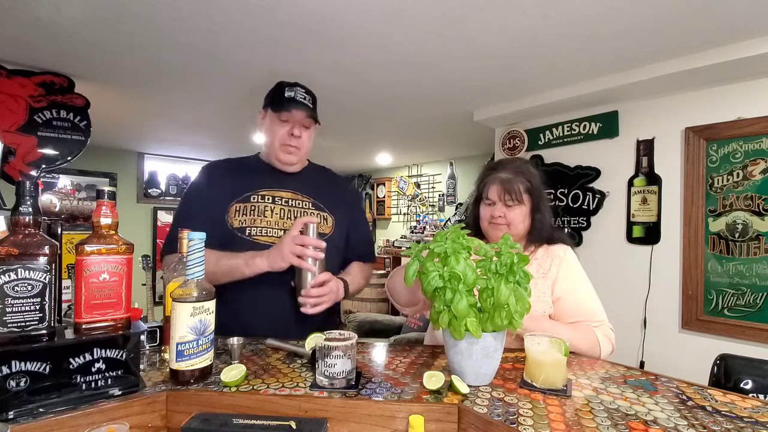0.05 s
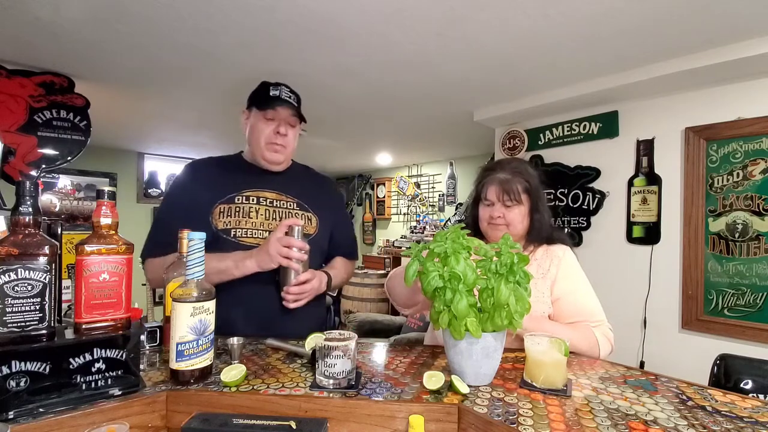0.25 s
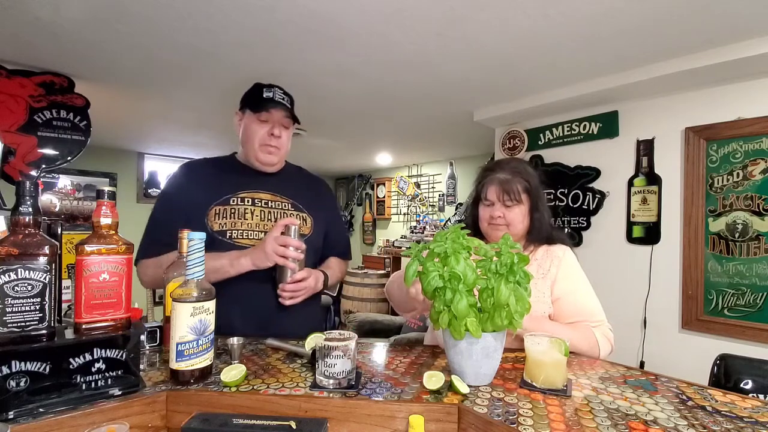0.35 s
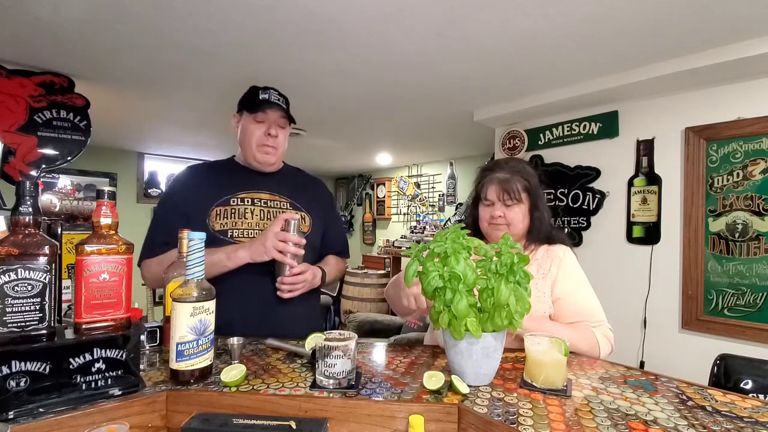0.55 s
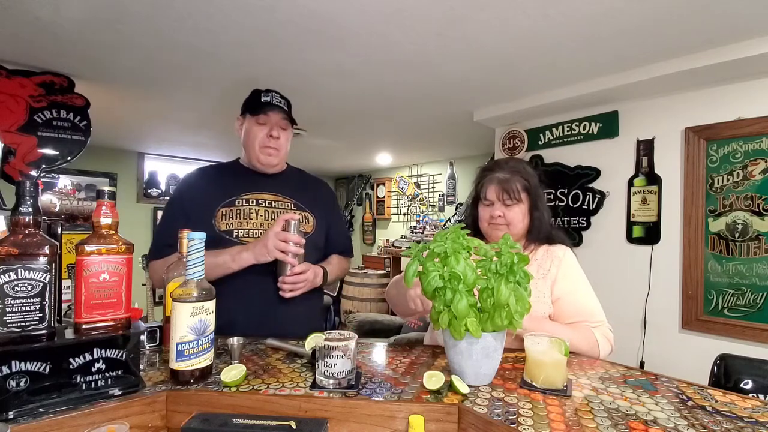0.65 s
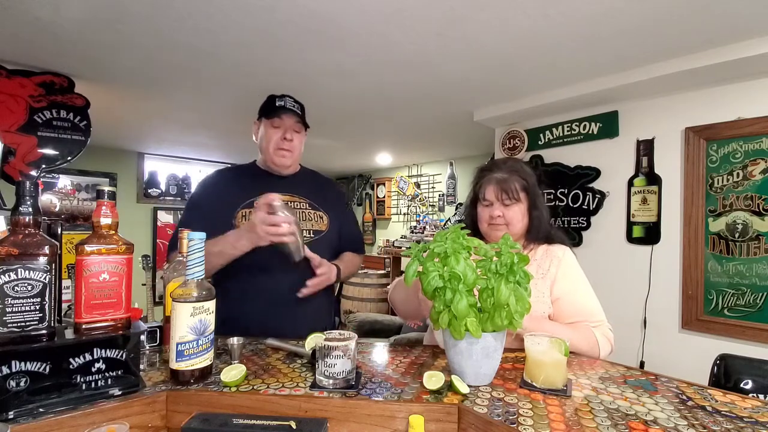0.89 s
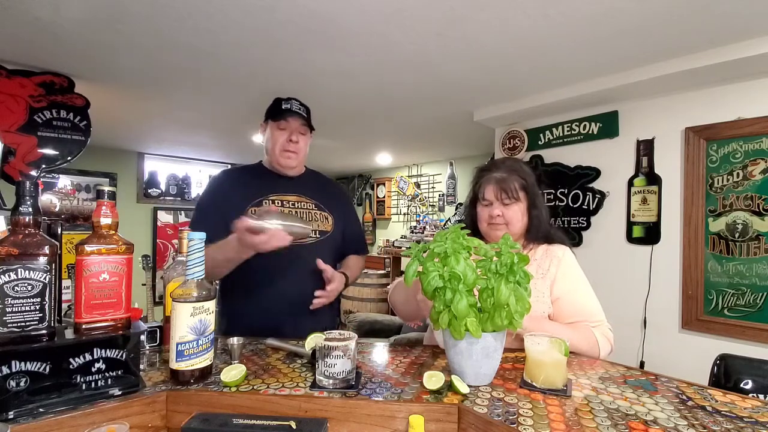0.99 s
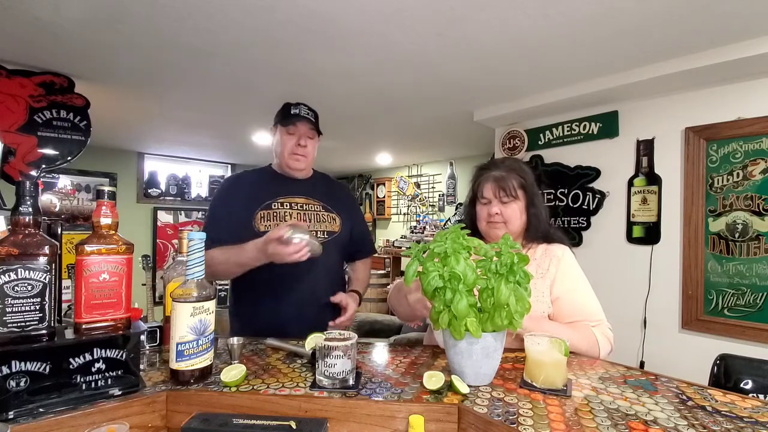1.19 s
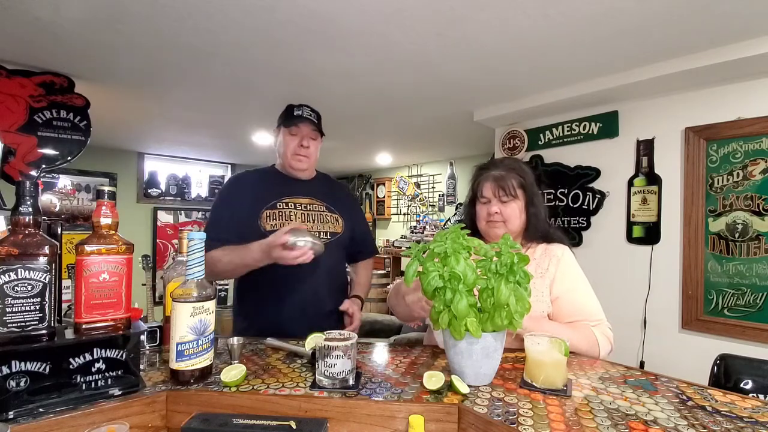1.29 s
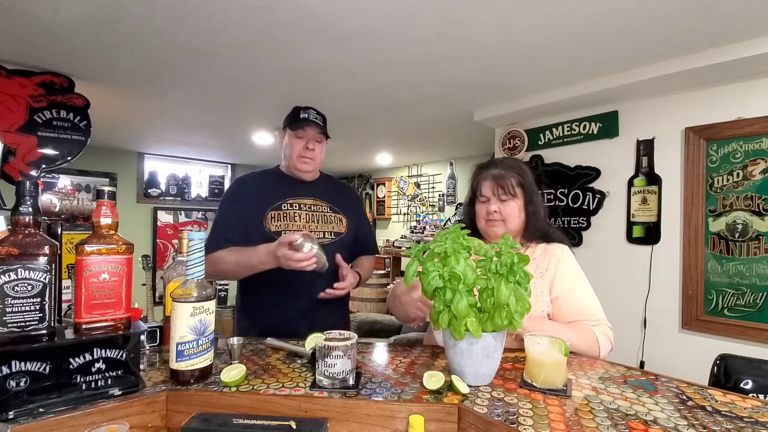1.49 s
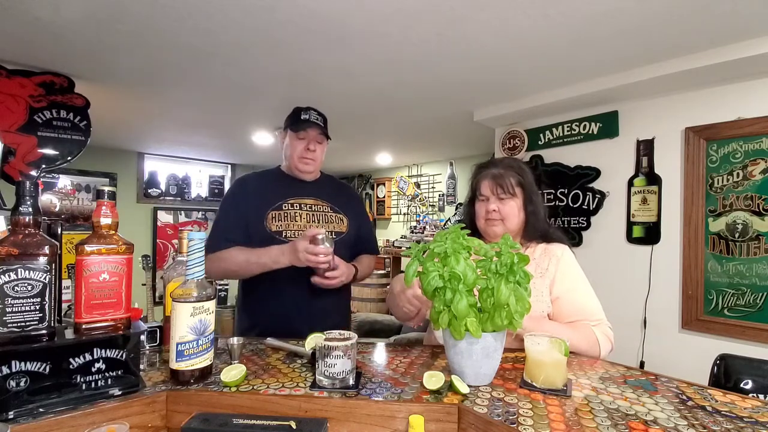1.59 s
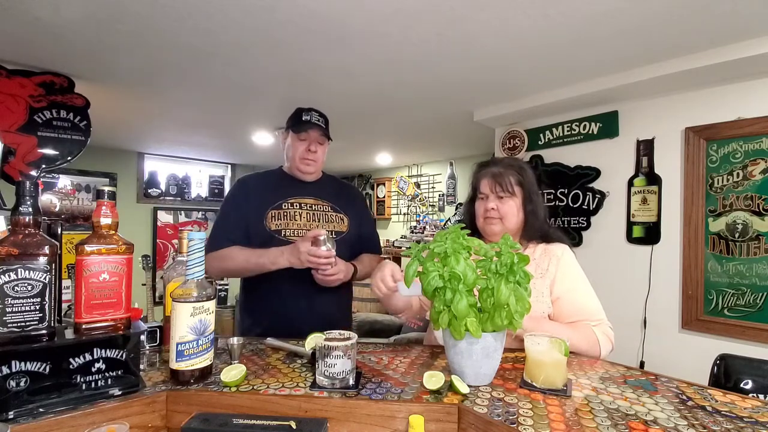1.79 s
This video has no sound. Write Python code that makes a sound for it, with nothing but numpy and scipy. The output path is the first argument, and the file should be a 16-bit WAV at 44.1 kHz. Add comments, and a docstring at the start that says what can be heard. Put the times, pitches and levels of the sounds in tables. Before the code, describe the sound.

Ice cubes knock and ring inside a steel cocktail shaker with sloshing liquid, two quick bouts of shaking, then metal clinks, a palm slap and a last tumble; small reverberant bar room, microphone a few metres away.

```python
"""A faint low room rumble, then ice shaken in a steel cocktail shaker in a small, live bar room, 2-3 m away.
Cubes knock and ring the tin (noise contacts, damped modes) over loose ice and liquid (random grains), in two bouts.
The shaker is then turned and handled: steel clinks (click and ping), a palm slap (short noise), a last tumble.
Soft low thumps (decaying tone and noise) lie beneath; the rumble is steady shaped noise."""
import sys
import numpy as np
from scipy import signal
from scipy.fft import rfft, irfft, next_fast_len
from scipy.io import wavfile
from scipy.ndimage import uniform_filter1d

SR = 44100
rng = np.random.default_rng(int(sys.argv[2]) if len(sys.argv) > 2 else 0)


def transcribe(signal):
    """Save signal, clipped to [-1, 1], as a 16-bit WAV file at the path in sys.argv[1]."""
    frames = np.atleast_2d(signal).T
    limited = np.clip(frames, -1, 1)
    pcm = np.round(limited * 32767).astype(np.int16)
    wavfile.write(sys.argv[1], SR, pcm)


N = 81585
T = np.arange(SR // 2) / SR  # time axis of one event, s
LEVEL_WINDOW_S = 0.005


def amp(db):
    """Decibels to gain."""
    return 10 ** (np.asarray(db) / 20)


def unit(x):
    """Scale to rms 1."""
    return x / np.sqrt(np.mean(x ** 2) + 1e-20)


def norm(x):
    """Scale to energy 1."""
    return x / np.linalg.norm(x)


def fade(t, t60_s):
    """Exponential decay, 60 dB in t60_s."""
    return amp(-60 * t / t60_s)


def swell(rise_s):
    """Exponential approach to 1."""
    return 1 - np.exp(-T / rise_s)


def along(points, hz):
    """Interpolate (f/Hz, value) points on a log frequency axis."""
    f, v = np.transpose(points)
    return np.interp(np.log(hz + 1), np.log(f + 1), v)


def filtered(x, response):
    """x times a response of frequency."""
    m = next_fast_len(N + SR // 2)
    hz = np.fft.rfftfreq(m, 1 / SR)
    return irfft(rfft(x, m) * response(hz), m)[..., :N]


def coloured(x, points, size=4096):
    """x through a causal minimum-phase filter of energy 1 with this spectrum shape."""
    gain = amp(along(points, np.fft.rfftfreq(size, 1 / SR)))
    cepstrum = irfft(np.log(gain))
    cepstrum[1:size // 2] *= 2
    cepstrum[size // 2 + 1:] = 0
    impulse = norm(irfft(np.exp(rfft(cepstrum))))
    return signal.fftconvolve(x, impulse)[:N]


def contact(t60_s, rise_s):
    """A touch and its micro-bounces: noise burst, flattened in spectrum, energy 1."""
    burst = norm(rng.standard_normal(len(T)) * fade(T, t60_s) * swell(rise_s))
    flat = irfft(np.exp(1j * np.angle(rfft(burst))), len(T))
    return norm(flat * fade(T, 10 * t60_s))


def note(hz, t60_s, rise_s):
    """One damped resonance, energy 1."""
    return norm(np.sin(2 * np.pi * hz * T) * fade(T, t60_s) * swell(rise_s))


def blows(rows, sound):
    """A fresh sound at each (t/s, level/dB); energy 1 is referred to LEVEL_WINDOW_S."""
    out = np.zeros(N + SR)
    for s, db in rows:
        start = round(s * SR)
        out[start:start + len(T)] += amp(db) * np.sqrt(LEVEL_WINDOW_S * SR) * sound()
    return out[:N]


def spread(pair, alike):
    """Two unrelated signals to left and right with a given correlation."""
    turn = np.arccos(np.clip(alike, -1, 1)) / 2
    mid, side = pair[0] * np.cos(turn), pair[1] * np.sin(turn)
    return np.array([mid + side, mid - side])


# room decay: f/Hz, T60/s
ROOM_DECAY = [(250, 0.13), (800, 0.34), (2200, 0.36), (14000, 0.24)]
# left-right likeness of the room answer: f/Hz, correlation
ROOM_LIKENESS = [(380, 0.45), (600, -0.59), (1000, -0.2)]
ROOM_BUILD_S = 0.0011


def room_tail():
    """Stereo decaying noise: one room answer, mean energy 1 per side."""
    hz, t, z = signal.stft(rng.standard_normal((2, len(T))), SR, nperseg=256)
    z = spread(z, along(ROOM_LIKENESS, hz)[:, None])
    z = z * fade(t, along(ROOM_DECAY, hz)[:, None])
    tail = signal.istft(z, SR, nperseg=256)[1][:, :len(T)] * swell(ROOM_BUILD_S)
    return np.sqrt(2) * norm(tail)


def in_room(x, room_db, lead_s=0, count=9):
    """Direct sound plus count crossfaded room answers, as the shaker moves; left leads by lead_s."""
    side = np.array([[1], [-1]])
    out = filtered(x, lambda hz: np.exp(1j * np.pi * hz * lead_s * side))
    place = np.linspace(0, count - 1, N)
    for k in range(count):
        part = x * np.cos(np.pi / 2 * np.clip(place - k, -1, 1))
        out = out + amp(room_db) * signal.fftconvolve(part[None], room_tail(), axes=1)[:, :N]
    return out


# rumble spectrum shape: f/Hz, relative level/dB
FLOOR = [(35, -36), (62, 3.5), (110, -18.5), (2600, -16.5), (3600, -23.5), (15000, -45)]
# left-right likeness of the rumble: f/Hz, correlation
FLOOR_LIKENESS = [(100, 0.98), (800, 0)]
FLOOR_RMS_DB = -55


def room_tone():
    """Steady ventilation rumble: shaped noise, alike left and right in the bass."""
    m = next_fast_len(N)
    hz = np.fft.rfftfreq(m, 1 / SR)
    noise = spread(rfft(rng.standard_normal((2, m))), along(FLOOR_LIKENESS, hz))
    air = irfft(noise * amp(along(FLOOR, hz)), m)[:, :N]
    return amp(FLOOR_RMS_DB) * unit(air)


# loose ice and liquid, levels before mix gains: t/s, rattle level/dB, slosh level/dB, treble level/dB
TUMBLE = [(0.126, -42, -50.5, -57.5), (0.198, -32.5, -40, -38), (.26, -25, -41.5, -45),
          (.32, -25, -32.5, -33.5), (.42, -28, -42.5, -45), (0.538, -36.5, -46.5, -50.5),
          (0.587, -26, -35.5, -36), (.79, -24.5, -33, -40), (0.899, -26, -35, -30.5),
          (.96, -31.5, -40.5, -34), (1.12, -37, -49, -29.5), (1.24, -33, -47.5, -37.5),
          (1.38, -32, -38.5, -41.5), (1.459, -32.5, -30.5, -28), (1.51, -57, -41, -42),
          (1.569, -31, -47.5, -42.5), (1.85, -42, -69, -53.5)]
RATTLE, SLOSH, TREBLE = 1, 2, 3  # columns
GRAINS_PER_S, GRAIN_SPREAD_DB, GRAIN_T60_S = 260, 2.5, 0.013


def tumble_db(column):
    """Interpolated tumble level, silent before the first row."""
    rows = np.transpose(TUMBLE)
    return np.interp(np.arange(N) / SR, rows[0], rows[column], left=-np.inf)


def grains(column):
    """Dense random patter of small contacts: noise under summed decays."""
    strength = amp(GRAIN_SPREAD_DB * np.clip(rng.standard_normal(N), -2, 2))
    hits = (rng.random(N) < GRAINS_PER_S / SR) * strength
    power = np.abs(signal.fftconvolve(hits ** 2, fade(T, GRAIN_T60_S) ** 2)[:N])
    patter = unit(np.sqrt(power) * rng.standard_normal(N))
    return patter * amp(tumble_db(column))


def vigour(x):
    """How hard the ice moves, 0-1: only hard shaking throws the cubes and rings the tin."""
    level = np.sqrt(np.abs(uniform_filter1d(x ** 2, size=900)))
    return level / level.max()


CLACKS_PER_S, CLACK_HZ, CLACK_OCTAVES, CLACK_T60_S, CLACK_DB = 120, 1588, 1.2, 0.018, -6.5


def clacks(count=400, size=3000):
    """Loose cubes collide at uneven moments; each clack has its own three damped pitches."""
    out, t = np.zeros(N + size), T[:size]
    for k, (late, strength, *pitches) in enumerate(rng.uniform(-1, 1, (count, 5))):
        start = round((k + 1 + late) / CLACKS_PER_S * SR)
        if start < N:
            hz = CLACK_HZ * 2 ** (CLACK_OCTAVES * np.array(pitches))
            tones = np.sin(2 * np.pi * hz[:, None] * t).sum(axis=0)
            out[start:start + size] += amp(2 * GRAIN_SPREAD_DB * strength) * fade(t, CLACK_T60_S) * tones
    return unit(out[:N]) * amp(CLACK_DB + tumble_db(RATTLE))


# cubes striking the tin, levels before mix gains: t/s, level/dB, hardness (crack boost)/dB, hollow note f/Hz
KNOCKS = [(.132, -21, -8, 1612), (.19, -20.5, 3, 812), (.2, -19.5, 5.5, 1880), (.221, -24, -12, 772),
          (.25, -22, -17, 800), (.286, -14.5, 5, 806), (.292, -28.5, 0, 790), (.381, -24, 9, 900),
          (.428, -36, 15, 1440), (.47, -28, -16, 763), (0.554, -23.5, -11, 812), (.603, -20, 5.5, 1256),
          (.648, -20, 1, 910), (.718, -21, -3, 1360), (.754, -18, -5, 1400), (.767, -20, 6, 758),
          (.818, -24, -14, 1296), (.861, -12, 1, 797), (0.882, -12.5, 0.5, 762), (.887, -22, -13, 781),
          (.982, -19, 0, 2016), (1.334, -27.5, -7, 800), (1.394, -19.5, 7.5, 1138), (1.41, -20.5, -4, 1105),
          (1.459, -16, -4, 798.6), (1.652, -33, -11, 950), (1.684, -33, 11, 846), (1.716, -33, 15, 1240),
          (1.794, -35, -7, 905)]
# knock and rattle colour: f/Hz, relative level/dB
BODY = [(150, -47), (300, -27.5), (480, -5), (1000, -0.5), (2000, -3), (2800, -2.5), (3700, -11),
        (8000, -29)]
KNOCK_T60_S, KNOCK_RISE_S, RATTLE_DB = 0.037, 0.0022, -5


def knock_body(strikes, rattle):
    """Dull body of cube impacts, loose rattle and clacks, in one colour."""
    knocks = blows(strikes, lambda: contact(KNOCK_T60_S, KNOCK_RISE_S))
    loose = amp(RATTLE_DB) * rattle + clacks() * vigour(rattle)
    return coloured(knocks + loose, BODY)


# modes of the filled tin: f/Hz, relative level/dB, T60/s
TIN = [(790, 3.5, 0.29), (841, 1.5, 0.36), (942, -9.5, 0.3), (1926, -2.5, 0.33), (2364, 10.5, 0.028),
       (2550, -10, 0.089)]
TIN_DB, RATTLE_RING_DB = -7.5, -5


def ringing(modes):
    """One ring of energy 1; each blow shares it out anew between the modes."""
    ring = 0
    for hz, db, t60_s in modes:
        level = amp(db + rng.normal(0, 1.0))
        ring = ring + level * fade(T, t60_s) * np.sin(2 * np.pi * hz * T + rng.uniform(0, 2 * np.pi))
    return norm(ring)


def tin_ring(strikes, rattle):
    """Tin modes rung by the knocks and by vigorous rattle."""
    struck = blows(strikes, lambda: ringing(TIN))
    shaken = signal.fftconvolve(rattle * vigour(rattle), ringing(TIN))[:N]
    return amp(TIN_DB) * struck + amp(RATTLE_RING_DB) * shaken


# crack and chip colour: f/Hz, relative level/dB
CRACK = [(1500, -11), (3500, 0.5), (7600, -6.5), (9500, -14), (15500, -11)]
CRACK_DB, CRACK_T60_S, CHIPS_DB = -12, 0.074, -1


def cracks_and_chips():
    """Treble of hard impacts and of loose chips: contacts plus grains."""
    rows = [(s, db + hard_db + CRACK_DB) for s, db, hard_db, hz in KNOCKS]
    cracks = blows(rows, lambda: contact(CRACK_T60_S, KNOCK_RISE_S))
    return coloured(cracks + amp(CHIPS_DB) * grains(TREBLE), CRACK)


# liquid colour: f/Hz, relative level/dB
SLOSH_COLOUR = [(190, -36.5), (290, -5.5), (440, 3.5), (800, -7), (1600, -31.5)]
SLOSH_DB = 0.5


def liquid():
    """Slosh: grains in a low-mid band."""
    return amp(SLOSH_DB) * coloured(grains(SLOSH), SLOSH_COLOUR)


ICE_DB, ICE_ROOM_DB = -5.5, 4.5


def ice():
    """Big cubes knock and ring the tin; loose ice, chips and liquid tumble between them."""
    strikes = [(s, db) for s, db, hard_db, hz in KNOCKS]
    rattle = grains(RATTLE)
    dry_ice = knock_body(strikes, rattle) + tin_ring(strikes, rattle) + cracks_and_chips() + liquid()
    return amp(ICE_DB) * in_room(dry_ice, ICE_ROOM_DB, count=14)


NOTE_DB, NOTE_T60_CYCLES = -4, 37  # fixed cycle count: high notes die sooner


def hollow_notes():
    """Each landing cube sounds a short note, its pitch set by where it hits and the air space left."""
    notes = np.zeros(N)
    for s, db, hard_db, hz in KNOCKS:
        t60_s = NOTE_T60_CYCLES / hz
        notes += blows([(s, db + NOTE_DB)], lambda: note(hz, t60_s, t60_s / 10))
    return in_room(notes, room_db=-1.0)


# soft thumps, as of weight shifting on the floor: t/s, level/dB
THUMPS = [(.378, -34), (.768, -36.5), (1.68, -44)]
THUMP_HZ, THUMP_T60_S, THUMP_RISE_S, THUMP_PUFF_DB = 93.6, 0.28, 0.025, -0.5


def boom():
    """Low room mode plus band noise, swelling then decaying."""
    band = signal.butter(2, [60, 150], "band", fs=SR, output="sos")
    puff = unit(signal.sosfilt(band, rng.standard_normal(len(T))))
    tone = np.sqrt(2) * np.sin(2 * np.pi * THUMP_HZ * T)
    push = (tone + amp(THUMP_PUFF_DB) * puff) * fade(T, THUMP_T60_S) * swell(THUMP_RISE_S)
    return push / np.sqrt(LEVEL_WINDOW_S * SR)  # cancels the gain in blows


def thumps():
    """A soft push sets a low room mode booming."""
    return blows(THUMPS, boom)


# steel-on-steel contacts: t/s, level/dB, ping re click/dB, ping f/Hz
CLINKS = [(1.0433, -18, -1.5, 4020), (1.047, -15, -4, 4530), (1.293, -18.5, -10.5, 3320),
          (1.536, -19, -12.5, 4870)]
# click colour: f/Hz, relative level/dB
CLINK_COLOUR = [(600, -33.5), (1600, -3.5), (4300, -3), (6000, -7.5), (7600, -6), (9700, -16.5),
                (15500, -10.5)]
CLINK_T60_S, CLINK_RISE_S, PING_T60_S = 0.015, 0.0012, 0.0039
CLINK_ROOM_DB, CLINK_LEAD_S = 4, 0.000186


def clinks():
    """Hard contacts click and give a short ping from the steel rim, damped by the hand."""
    rows = [(s, db) for s, db, ping_db, hz in CLINKS]
    click = coloured(blows(rows, lambda: contact(CLINK_T60_S, CLINK_RISE_S)), CLINK_COLOUR)
    ping = np.zeros(N)
    for s, db, ping_db, hz in CLINKS:
        ping += blows([(s, db + ping_db)], lambda: note(hz, PING_T60_S, PING_T60_S / 10))
    return in_room(click + ping, CLINK_ROOM_DB, CLINK_LEAD_S, count=4)


# palm slap colour: f/Hz, relative level/dB
SLAP_COLOUR = [(170, -37), (290, -0.5), (500, -5.5), (1114, 1.5), (2500, -5), (6000, -30)]
SLAP_AT_S, SLAP_DB, SLAP_T60_S, SLAP_RISE_S, SLAP_ROOM_DB = 1.1578, -17, 0.03, 0.0019, 2


def slap():
    """A palm lands on the tin and damps it at once: one short contact, no ring."""
    pat = blows([(SLAP_AT_S, SLAP_DB)], lambda: contact(SLAP_T60_S, SLAP_RISE_S))
    return in_room(coloured(pat, SLAP_COLOUR), SLAP_ROOM_DB, count=2)


def scene():
    """Everything at the two microphone ports."""
    return room_tone() + ice() + hollow_notes() + thumps() + clinks() + slap()


# port colour: f/Hz, left re right/dB
MIC_BALANCE = [(450, -0.48), (1500, 1.7), (4500, 0.77)]
TOP_HZ = 15800


def record(dry):
    """Half the port balance to each side; nothing is kept from TOP_HZ up."""
    half = np.array([[.5], [-.5]])
    return filtered(dry, lambda hz: amp(along(MIC_BALANCE, hz) * half) * (hz < TOP_HZ))


dry = scene()
out = record(dry)
transcribe(out)
```